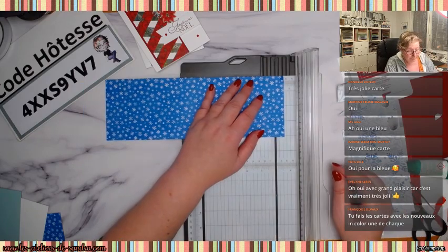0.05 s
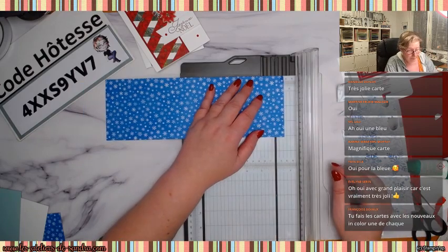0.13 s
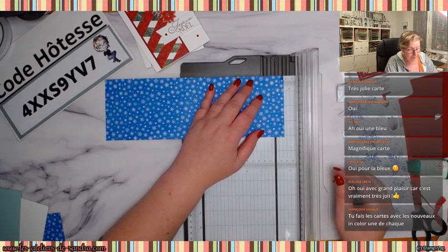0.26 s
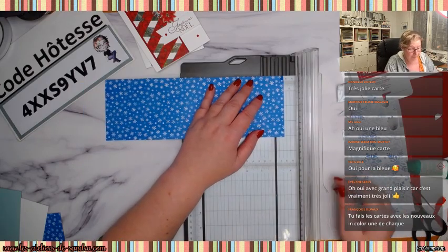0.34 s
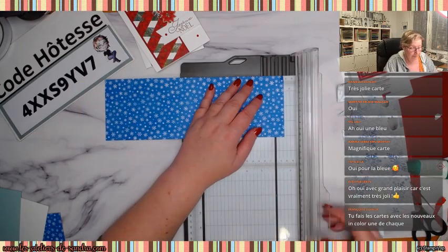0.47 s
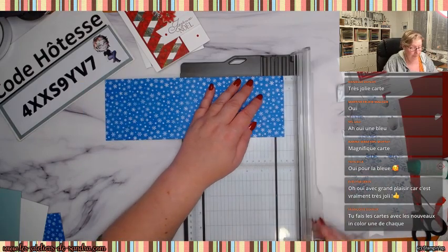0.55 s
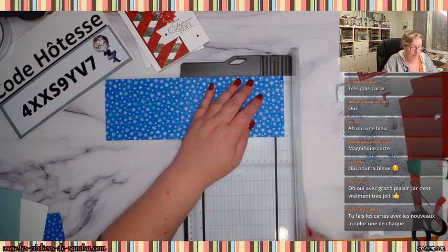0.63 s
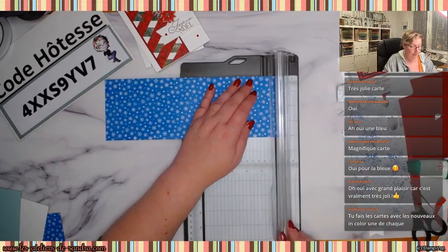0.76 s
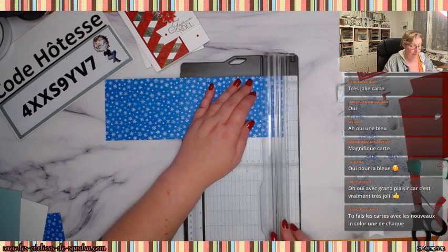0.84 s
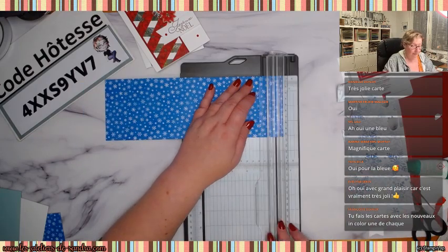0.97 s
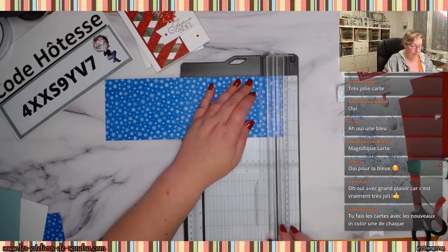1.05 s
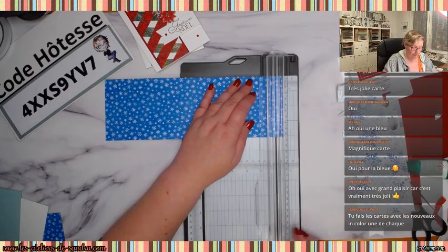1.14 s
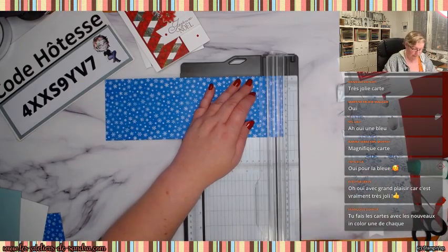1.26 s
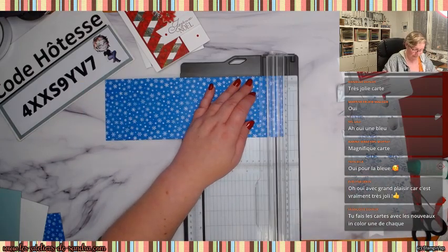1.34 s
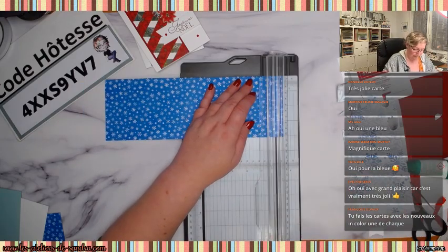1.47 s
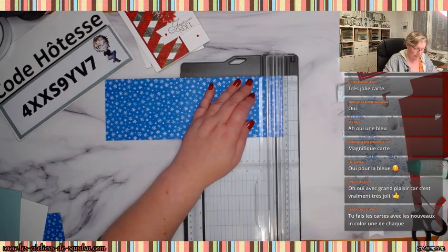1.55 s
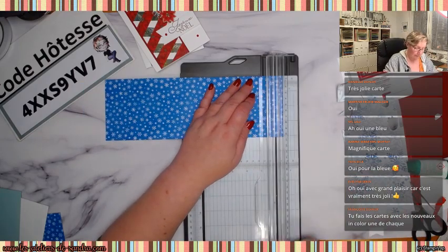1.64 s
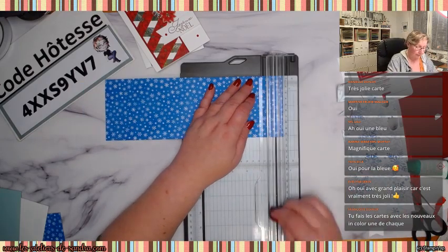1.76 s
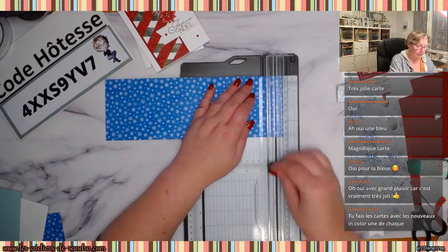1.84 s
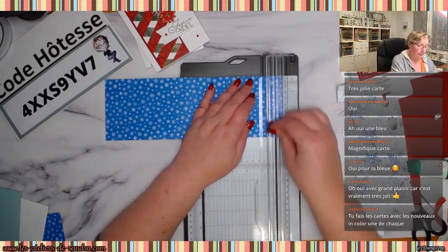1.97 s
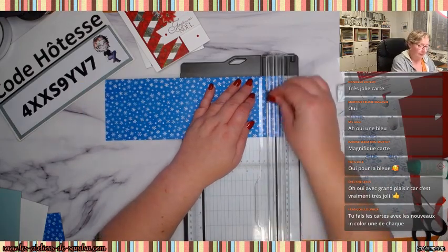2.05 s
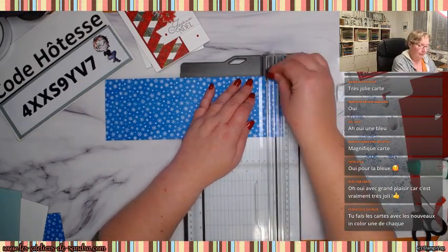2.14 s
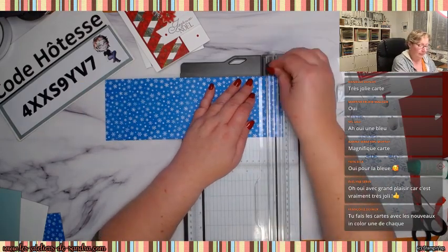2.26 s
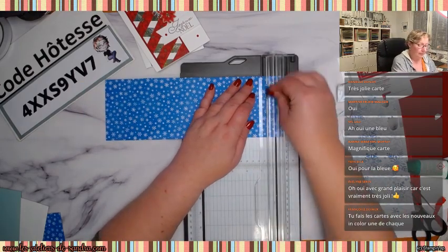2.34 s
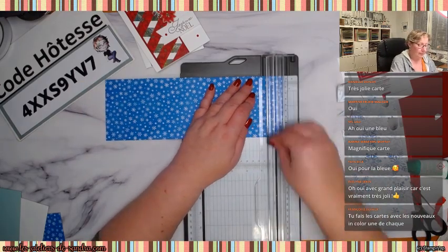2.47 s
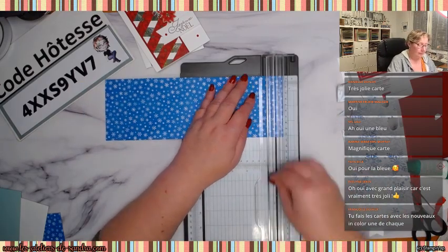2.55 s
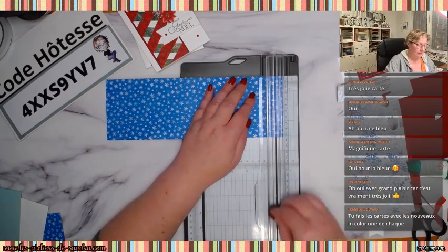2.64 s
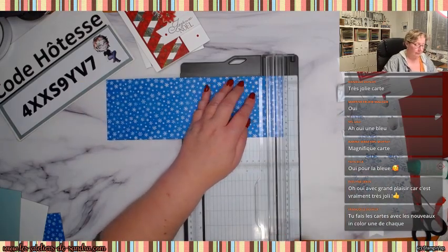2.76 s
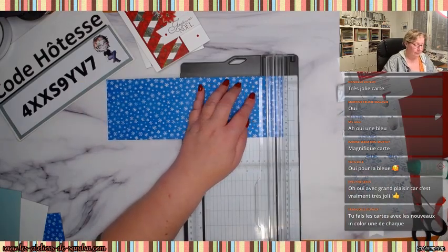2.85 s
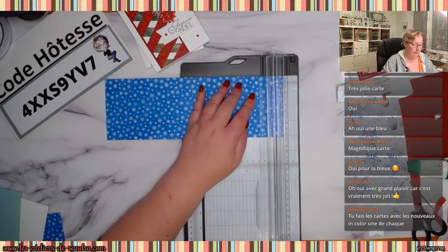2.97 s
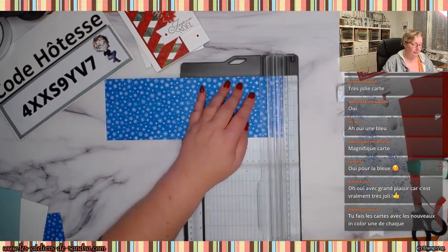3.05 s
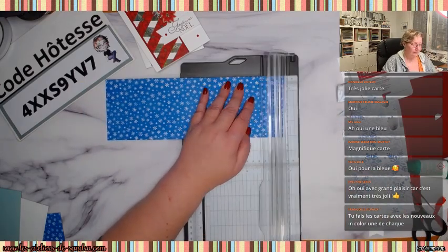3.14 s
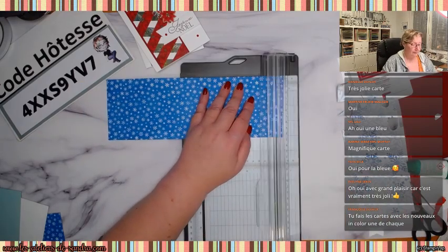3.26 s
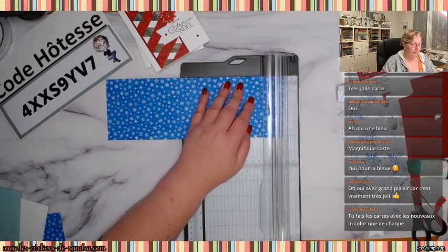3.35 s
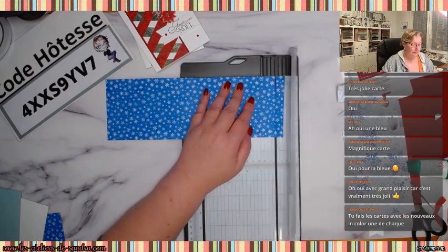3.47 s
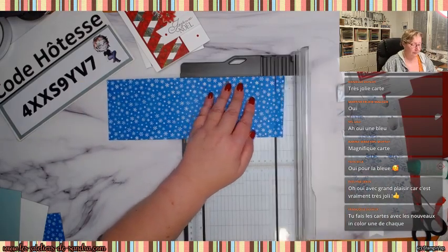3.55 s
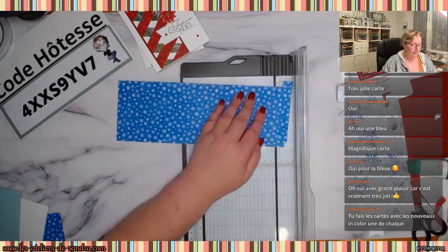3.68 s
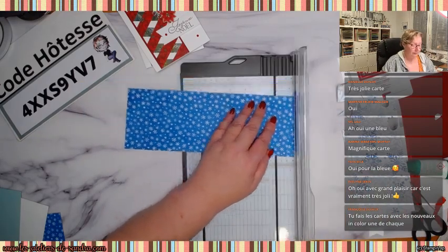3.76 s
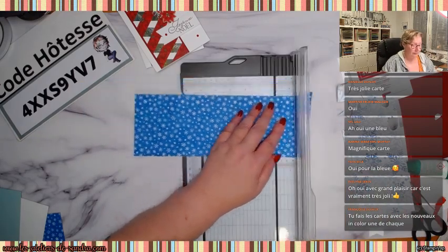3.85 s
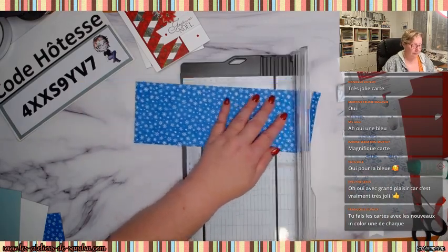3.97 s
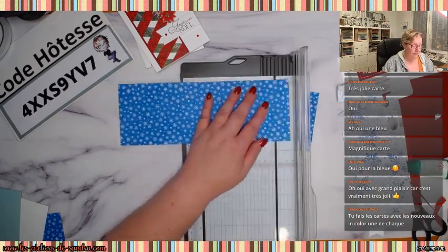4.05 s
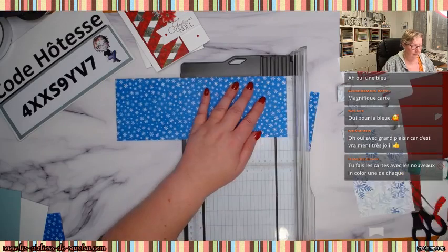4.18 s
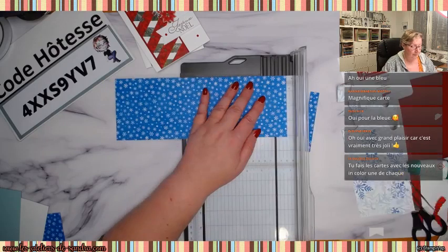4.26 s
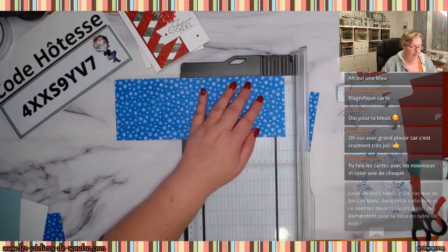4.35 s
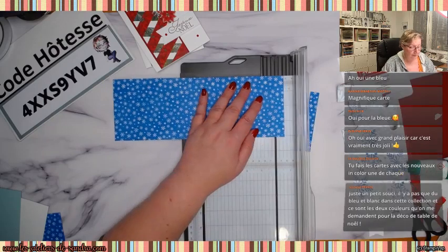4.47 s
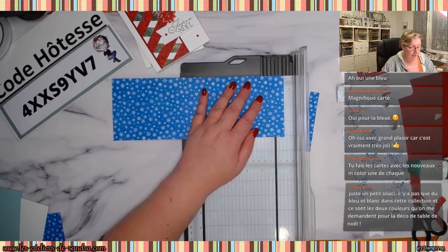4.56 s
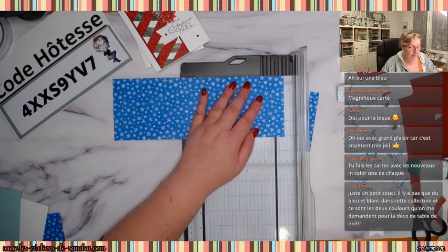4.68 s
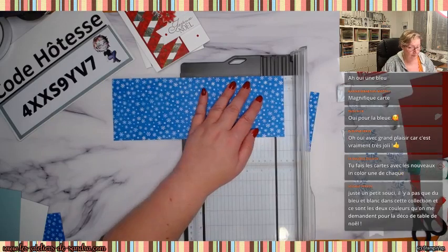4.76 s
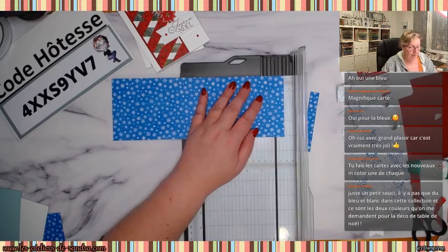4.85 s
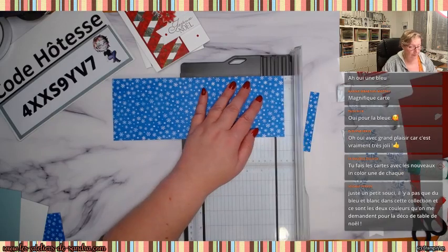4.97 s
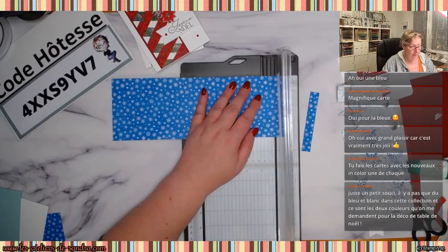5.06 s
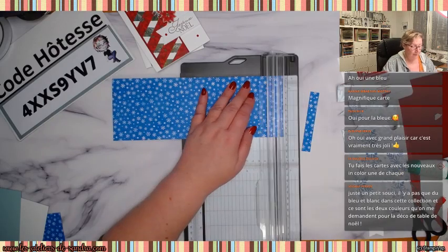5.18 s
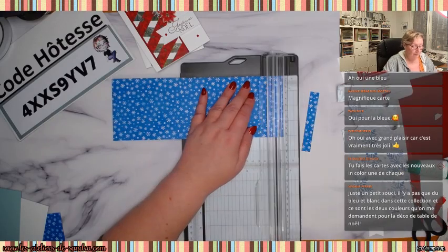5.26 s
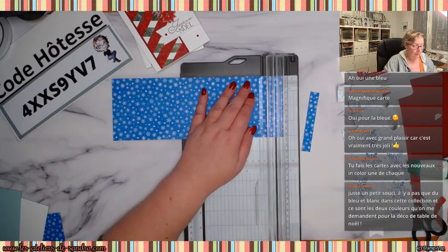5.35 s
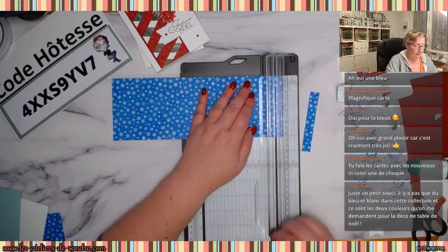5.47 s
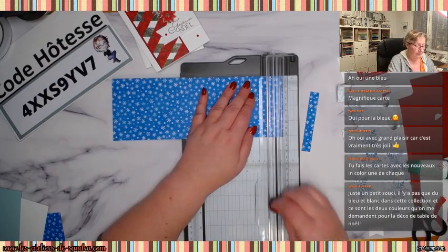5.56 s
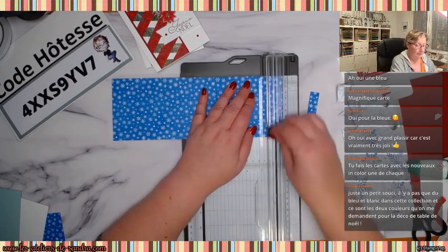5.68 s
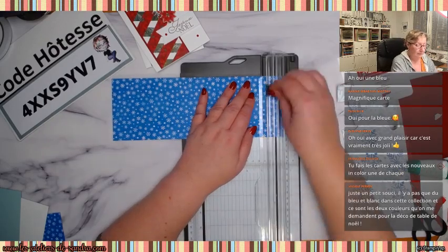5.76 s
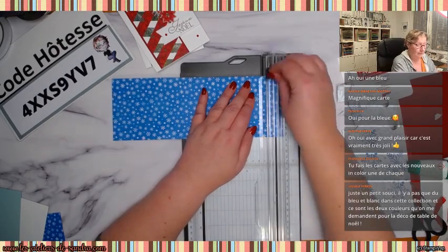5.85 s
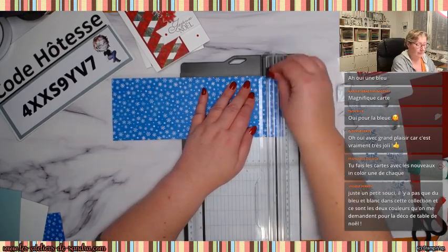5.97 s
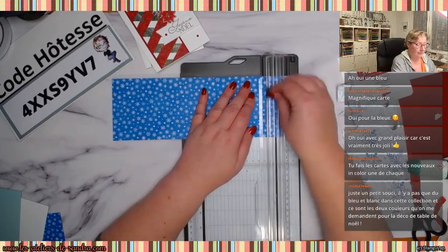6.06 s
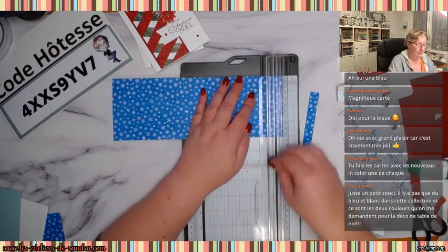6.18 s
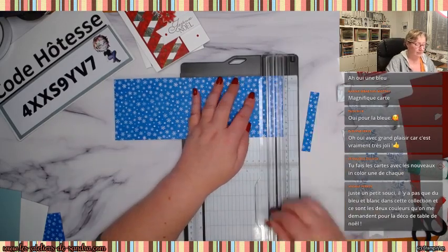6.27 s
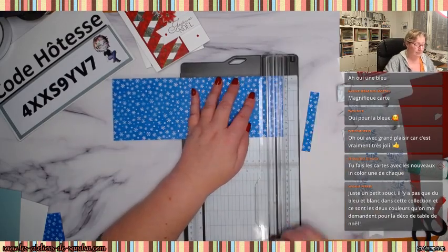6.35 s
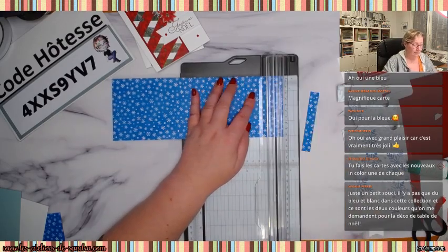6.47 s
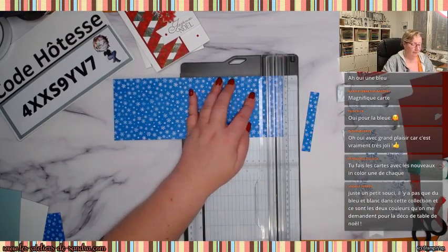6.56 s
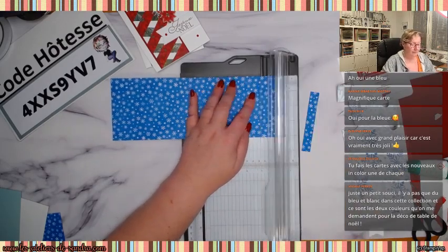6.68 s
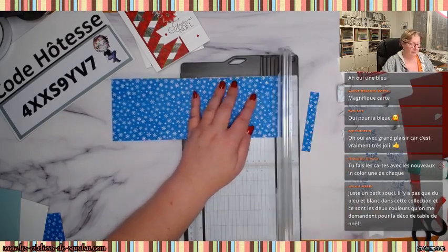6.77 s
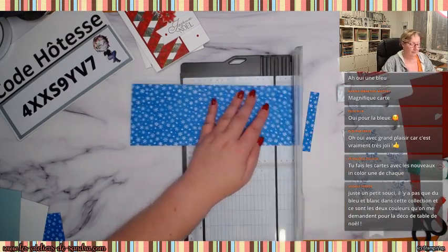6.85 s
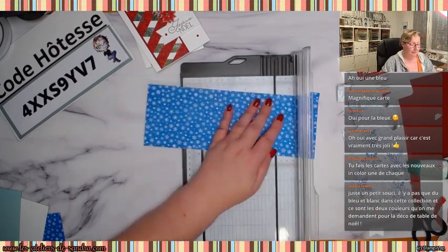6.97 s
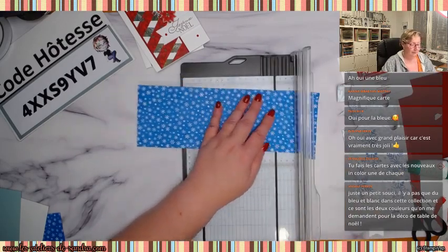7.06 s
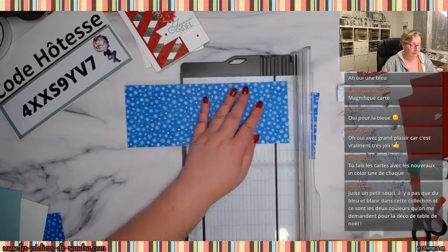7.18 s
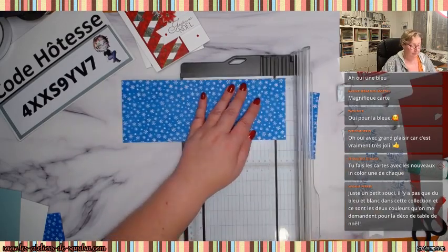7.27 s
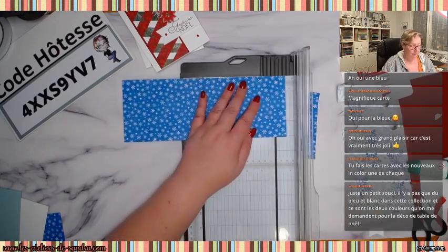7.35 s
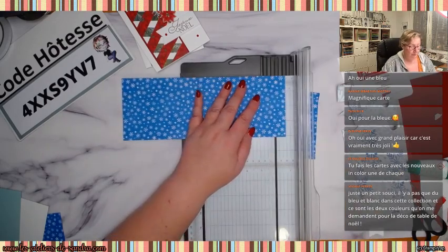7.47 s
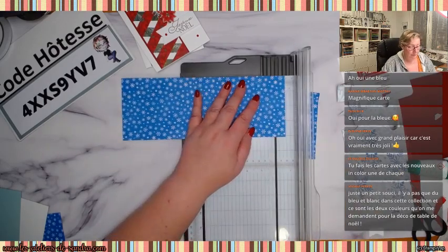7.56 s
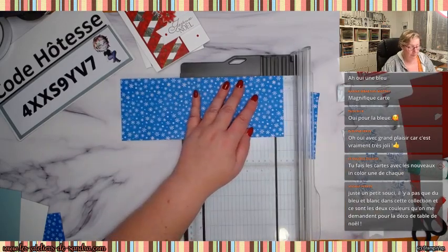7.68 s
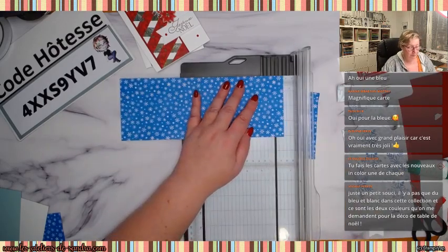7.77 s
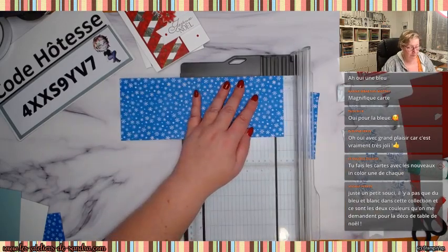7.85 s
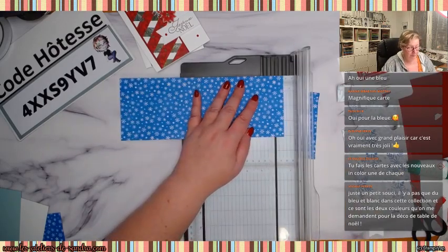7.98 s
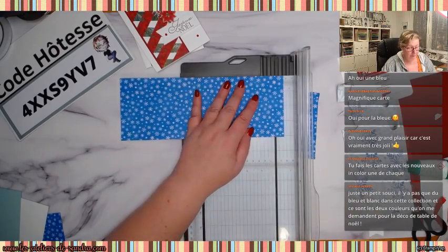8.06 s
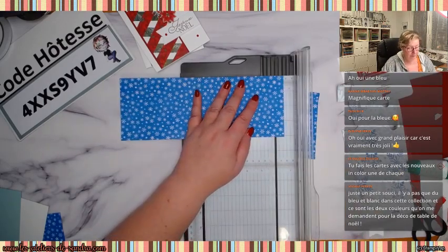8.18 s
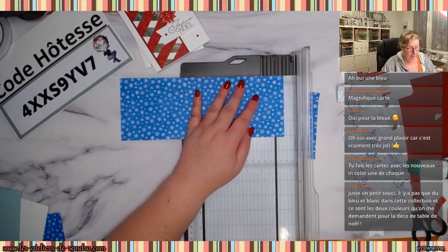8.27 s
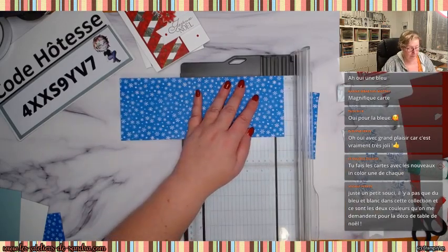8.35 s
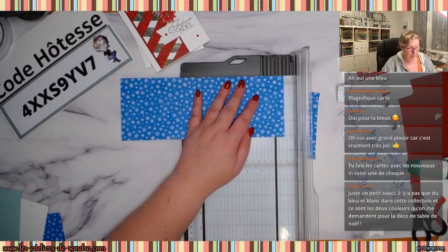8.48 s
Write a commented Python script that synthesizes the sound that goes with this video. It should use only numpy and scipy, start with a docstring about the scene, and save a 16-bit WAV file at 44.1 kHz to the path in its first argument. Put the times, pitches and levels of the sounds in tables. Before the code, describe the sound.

Paper trimming on a tabletop, closely miked with short room reflections. Dry hissing and hollow grumbling slides lead to hard plastic slaps, then a brief gritty tearing rasp with a snap. Hinge chatter, low table thumps and soft swishes of repositioned card come between. The same sequence repeats once, with a stronger rail slap and brighter snap, then settles to near silence.

```python
"""A plastic paper trimmer on a craft table: twice its blade rasps through card with a late bright snap.
Band-shaped fibre noise and rising resonances make the rasp; short damped noise makes the slapping,
clattering rail and the clicks. Carriage, hands and card slide as streaky friction noise, and blows
push the table top into a low swing. Small room, close microphone, quiet room tone."""
import sys
import numpy as np
from scipy import signal
from scipy.fft import rfft, irfft, next_fast_len
from scipy.io import wavfile
from scipy.ndimage import map_coordinates

SR = 44100
rng = np.random.default_rng(int(sys.argv[2]) if len(sys.argv) > 2 else 0)


def int16_out(signal):
    """Quantize to a 16-bit WAV file."""
    q = np.round(np.clip(np.atleast_2d(signal).T, -1, 1) * 32767)
    wavfile.write(sys.argv[1], SR, q.astype(np.int16))


N = 375732
TIME = np.arange(N) / SR

# colour of struck plastic: [f/Hz, relative level per Hz/dB]
PLASTIC = [(88, -45.5), (150, -13.5), (264, -9.5), (524, 0), (637, -3), (941, -6), (1060, -6.5),
           (2060, -4.5), (2270, -9), (3350, -4.5), (5790, -12), (6260, -14.5), (9260, -23), (12900, -23),
           (16000, -30.5)]
# the blade crosses the card: [start/s, end/s, rasp level/dB, table thump peak/dB]
CUTS = [(1.959, 2.188, -40.5, -37), (5.702, 5.877, -40, -32.5)]
# the blade snaps through a knot of fibres: [t/s, peak/dB, top f/Hz]
SNAGS = [(2.1348, -25.5, 6900), (5.838, -18, 14000)]
# the rail slaps shut: [t/s, strength/dB, hollow lows/dB, bright edge/dB, length/factor, ring f/Hz,
# table thump peak/dB]
SLAPS = [(0.8893, -27, -3, -3, 1.3, 1330, -31.5), (1.5835, -20, -0.5, -1, 0.94, 771, -31.5),
         (5.3851, -17.5, -3, 2, .92, 1304, -27.5)]


def amp(db):
    """Decibels to gain."""
    return 10 ** (np.asarray(db) / 20)


def unit(x):
    """Scales to rms 1."""
    return x / np.sqrt(np.mean(x ** 2) + 1e-20)


def read(points, hz):
    """Reads a curve on a log-frequency axis."""
    f, value = np.transpose(points)
    return np.interp(np.log(hz + 1), np.log(f + 1), value)


def add(mix, s, sound):
    """Mixes a sound in at time s."""
    part = mix[max(round(s * SR), 0):][:len(sound)]
    part += sound[:len(part)]


def band(x, lo_hz, hi_hz, order=2):
    """Causal band-pass."""
    edges = [lo_hz, min(hi_hz, SR / 2 - 100)]
    return signal.sosfilt(signal.butter(order, edges, "band", fs=SR, output="sos"), x)


def colour(x, points):
    """Gives x a spectrum, at rms 1."""
    size = next_fast_len(N)
    gain = amp(read(points, np.fft.rfftfreq(size, 1 / SR)))
    return unit(irfft(rfft(x, size) * gain, size)[:N])


def wander(per_s):
    """Smooth random drift of rms 1, with per_s turning knots a second."""
    knots = rng.standard_normal(N // 20)
    return unit(np.interp(TIME * per_s, np.arange(len(knots)), knots))


def friction(grain_db, flutter_db, flutter_per_s):
    """Countless tiny slips of uneven size, coming in clumps."""
    slips = rng.standard_normal(N) * amp(grain_db * np.minimum(rng.exponential(1, N), 6))
    return unit(slips * amp(flutter_db * wander(flutter_per_s)))


def resonate(x, hz, width):
    """A resonance that follows the curve hz, at rms 1."""
    turn = np.exp(2j * np.pi * np.cumsum(hz) / SR)
    r = np.exp(-np.pi * width / SR)
    return unit((turn * signal.lfilter([1 - r], [1, -r], x / turn)).real)


def streaks(x, depth_db, width_hz, life_s, climb_hz_per_s):
    """The contact point moves, so small peaks of colour come, drift in pitch and go."""
    hz, t, z = signal.stft(x, SR, nperseg=512, noverlap=384)
    place = [(hz[:, None] - climb_hz_per_s * t) / width_hz, np.ones((len(hz), 1)) * t / life_s]
    patches = unit(map_coordinates(rng.standard_normal((256, 512)), place, order=1, mode="grid-wrap"))
    return unit(signal.istft(z * amp(depth_db * patches), SR, nperseg=512, noverlap=384)[1][:N])


def stroke(start, end, swell_db, rise_s, fall_s):
    """A hand movement: it gathers speed, holds with a steady swell or fade, and slows."""
    gate = np.interp(TIME, [start - rise_s, start, end, end + fall_s], [0, 1, 1, 0])
    progress = np.clip((TIME - start) / (end - start) - .5, -.5, .5)
    return gate ** 2 * amp(swell_db * progress)


def room_tone(level_db=-64.5):
    """Steady noise, mostly low rumble, for the air of the room."""
    # colour of the room tone: [f/Hz, relative level per Hz/dB]
    air_colour = [(12, -27), (20, 3), (68, -9.5), (104, -11), (187, -18), (221, -13), (335, -21.5),
                  (408, -24.5), (510, -32), (637, -24.5), (754, -38), (866, -30.5), (1650, -34.5),
                  (6290, -40), (15800, -43.5)]
    return amp(level_db) * colour(rng.standard_normal(N), air_colour)


def room(x, wet_db=-12, first_s=0.0055, treble_db=-2, bass_db=-3):
    """Sparse reflections from nearby shelves and walls, each band dying at its own speed."""
    # decay of the reflections: [f/Hz, t60/s]
    decay = [(150, 0.91), (600, 0.36), (2000, 0.23), (5000, 0.22), (14000, 0.3)]
    size = SR // 2
    taps = rng.choice([-1., 1.], size) * (rng.random(size) < 3000 / SR)  # 3000 a second on average
    taps = taps * (np.arange(size) > first_s * SR)
    hz, t, z = signal.stft(taps, SR, nperseg=256)
    tail = signal.istft(z * amp(-60 * t / read(decay, hz)[:, None]), SR, nperseg=256)[1]
    tone_points = [(500, bass_db), (1000, 0), (4500, 0.012), (9000, treble_db)]  # f/Hz, level/dB
    tone = read(tone_points, np.fft.rfftfreq(len(tail), 1 / SR))
    reflections = irfft(rfft(tail / np.linalg.norm(tail)) * amp(tone))
    return amp(wet_db) * signal.oaconvolve(x, reflections)[:N]


def bumps(slap_lag_s=.01, slap_ms=1.9, cut_ms=1.3, snag_ms=.35):
    """All pushes on the table: by hands and trimmer, under slaps, and as the blade enters, snags and leaves."""
    # hands and trimmer bumping the table: [t/s, peak/dB, contact time/ms]
    hand_bumps = [(.612, -39.5, 3.2), (.662, -39, 4.6), (1.07, -47, 1), (1.205, -45.5, 1), (1.239, -46, 4),
                  (1.864, -40, 3.1), (2.671, -33.5, 3.7), (2.722, -34, 6.2), (2.83, -35, 0.96),
                  (3.025, -40, 1.5), (3.13, -22.5, .9), (3.159, -28.5, 2.7), (3.4065, -22.5, 0.67),
                  (3.517, -35.5, 0.73), (5.243, -33, 3.1), (5.513, -29.5, 5.5), (5.786, -26, 1.2),
                  (6.11, -40.5, 2.2), (6.367, -42, 4.1), (6.755, -28.5, 0.64), (6.794, -28.5, 1.64)]
    rows = list(hand_bumps)
    rows += [(s + slap_lag_s, thump_db, slap_ms) for s, *_, thump_db in SLAPS]
    for (start, end, _, thump_db), (snag_s, *_) in zip(CUTS, SNAGS):
        rows += [(start, thump_db, cut_ms), (snag_s, thump_db, snag_ms), (end, thump_db, cut_ms)]
    return rows


def thumps(table_hz=37, table_q=1.25):
    """A short push on the table top, which swings back; harder contacts also wake its higher modes."""
    # higher modes of the table top: [f/Hz, level/dB, t60/s]
    board_modes = [(121, -16, 0.17), (210, -9, 0.045), (336, -6, 0.018)]
    t, out = np.arange(SR // 5) / SR, np.zeros(N)
    w = 2 * np.pi * table_hz
    b, a = signal.bilinear([1, 0, 0], [1, w / table_q, w * w], SR)
    board = sum(2 * np.pi * hz / SR * amp(db - 60 * t / t60) * np.cos(2 * np.pi * hz * t)
                for hz, db, t60 in board_modes)
    for s, db, contact_ms in bumps():
        u = 1000 * t / contact_ms
        push = u * np.exp(-u)  # strongest after one contact time
        swing = signal.lfilter(b, a, push) + signal.fftconvolve(push, board)[:len(t)]
        add(out, s - contact_ms / 1000, amp(db) * swing / abs(swing).max())
    return out


def card(card_db=-3.0, rise_s=0.045, fall_s=0.085, fizz_above_hz=5900):
    """The sheet swishes along the bed under the fingers; some pushes fizz more than others."""
    # pushes along the bed: [start/s, end/s, level before card_db/dB, swell from start to end/dB,
    # extra fizz/dB]
    pushes = [(3.623, 3.906, -52.5, -0.5, -1), (3.98, 4.105, -52, -7.5, 1), (6.784, 6.965, -50, 4.5, 1.5),
              (7.079, 7.185, -50.5, 0.5, -2)]
    # colour of the swish: [f/Hz, relative level per Hz/dB]
    card_colour = [(180, -16), (300, -1.5), (477, -16), (592, -7.5), (1470, -8), (1990, -5), (2470, -8.5),
                   (4060, -3), (4790, -7.5), (5470, -7.5), (7620, -12.5), (13600, -9), (15800, -15)]
    swish = colour(friction(grain_db=0.4, flutter_db=0.74, flutter_per_s=110), card_colour)
    swish = streaks(swish, depth_db=2, width_hz=400, life_s=.06, climb_hz_per_s=0)
    fizz = signal.sosfiltfilt(signal.butter(2, fizz_above_hz, "high", fs=SR, output="sos"), swish)
    out = np.zeros(N)
    for start, end, db, swell_db, fizz_db in pushes:
        shape = stroke(start, end, swell_db, rise_s, fall_s)
        out += amp(card_db + db) * shape * (swish + (amp(fizz_db) - 1) * fizz)
    return out


def sliding(rise_s=0.12, fall_s=0.077, overrun_s=0.084, overrun_hiss_db=-79, overrun_grumble_db=-56):
    """Speed and pressure of everything that slides over the plastic."""
    # carriage runs, rail swings, grips and finger moves: [start/s, end/s, hiss drive/dB,
    # grumble drive/dB, swell from start to end/dB]
    strokes = [(.17, 0.29, -76, -70.5, 18.5), (0.332, 0.897, -64.5, -59, 0.5), (1.02, 1.26, -72.5, -66, 7),
               (1.6, 1.947, -60.5, -55.5, -1), (2.38, 2.746, -58.5, -57.5, -3),
               (2.78, 3.309, -66.5, -61, 0), (3.408, 3.579, -59, -56.5, -4), (4.194, 4.4, -76, -79, -2),
               (4.648, 4.983, -81, -69, 12), (5.02, 5.352, -62, -59, 7), (5.45, 5.7, -60.5, -59, 5.5),
               (6.052, 6.171, -58, -53, 4), (6.182, 6.303, -59, -58, -3), (6.3, 6.8, -65, -59, 3.5),
               (6.82, 7.628, -76.5, -66.5, -7.5), (7.9, 8.064, -90.5, -75.5, -1.5)]
    # the carriage rolls on through each cut and just beyond
    overruns = [(start, end + overrun_s, overrun_hiss_db, overrun_grumble_db, 0) for start, end, *_ in CUTS]
    speed, pressure = np.zeros((2, N))
    for start, end, hiss_db, grumble_db, swell_db in list(strokes) + overruns:
        shape = stroke(start, end, swell_db, rise_s, fall_s)
        speed = np.maximum(speed, amp(hiss_db) * shape)
        pressure = np.maximum(pressure, amp(grumble_db) * shape)
    return speed, pressure


def rubbing(hiss_db=-1, grumble_db=0.92, shift_db=3, catch_db=-16, catches_per_s=45):
    """Dry sliding over plastic: a hiss of shifting colour and tiny catches above the grumble of the hollow bed."""
    # colour of the hiss: [f/Hz, relative level per Hz/dB]
    hiss_colour = [(710, -37), (1200, -3), (1280, 4), (1540, -4), (1660, 1), (2550, -2), (2970, -2.5),
                   (3420, -1.5), (4280, -2.5), (8100, -12), (10300, -14), (11900, -10.5), (15800, -20.5)]
    # colour of the grumble: [f/Hz, relative level per Hz/dB]
    grumble_colour = [(30, 2), (70, 8), (150, 0.5), (300, 0), (450, -5), (600, -0.5), (900, -8),
                      (1300, -14), (2200, -34.5)]
    # bright bands of dry sliding: [f/Hz, width/Hz, level at top speed/dB]
    squeaks = [(4200, 490, -5), (10400, 1100, -8)]
    speed, pressure = sliding()
    hiss = colour(friction(grain_db=1.0, flutter_db=2.5, flutter_per_s=100), hiss_colour)
    hiss = streaks(hiss, depth_db=1.8, width_hz=600, life_s=.05, climb_hz_per_s=-3000)
    for hz, width, db in squeaks:
        squeak = resonate(rng.standard_normal(N), hz * (1 + 0.022 * wander(7)), width)
        # squeaks gain on the hiss as the sliding gets faster
        hiss = hiss + amp(db + shift_db * wander(12)) * speed / speed.max() * squeak
    grumble = colour(friction(grain_db=2.5, flutter_db=1.7, flutter_per_s=40), grumble_colour)
    catches = rng.uniform(-0.87, 1, N) * (rng.random(N) < catches_per_s / SR)
    catches = colour(catches, PLASTIC)
    t = np.arange(SR // 40) / SR
    shiver = rng.standard_normal(len(t)) * amp(-60 * t / 0.028)  # each catch shivers briefly
    catches = unit(signal.oaconvolve(catches, shiver)[:N])
    bed = amp(grumble_db) * grumble + amp(catch_db) * catches
    return amp(hiss_db) * speed * hiss + pressure * bed


def contacts(count=4, rebound_hollow_db=0, rebound_gap_ratio=1.05, give_lead_s=0.0046, give_db=-16,
             give_length=2.6):
    """All plastic contacts: single clicks, the landings of the rail, and chatter of weakening rebounds."""
    # contacts of carriage, rail and fingernails: [t/s, strength/dB, hollow lows/dB, bright edge/dB,
    # length/factor, ring f/Hz]
    clicks = [(.349, -67, 20, -16, 0.9, 560), (.642, -63, 6, 6, 5, 620), (.687, -47, -3, -3, 0.9, 3420),
              (.793, -53.5, -2, -14, 1.6, 1346), (.832, -52.5, 3, -25, 0.98, 870),
              (1.067, -65, -17, -2, 1, 1400), (1.229, -61, -4, 1.5, 1.5, 4000),
              (1.536, -48.5, 2.5, -24.5, 2.4, 1823), (1.551, -54.5, 11.5, -37, 1.4, 800),
              (2.294, -62.5, 20, -24, 0.63, 604), (2.483, -60, 20.5, 3, 1.2, 560),
              (2.881, -49.5, 4, -37, 2.5, 1970), (2.923, -50.5, 7, -11, 1, 2280),
              (2.9395, -61.5, 23, -23, 0.7, 900), (3.089, -50, 0, -7, 5.5, 1810),
              (3.109, -57, 9, -4, 1.6, 1400), (3.133, -44, 18, -17, 1.9, 370),
              (3.1565, -53, -10, 6, .9, 3970), (3.19, -64, 20, -10, 1.5, 1720),
              (3.25, -50, 4, -30, 2.8, 1790), (3.4065, -46.5, 2, 4, .3, 4030),
              (3.564, -57.5, 5, -23, 0.68, 1820), (4.164, -50.5, -5, -36, 0.76, 1350),
              (4.19, -49.5, -3, -33, 1.2, 1285), (4.32, -70, -2.5, 6, 3.7, 4000),
              (5.336, -32.5, -10, -8, 0.74, 3730), (5.3705, -46.5, 9.5, -6, 1.1, 790),
              (5.979, -62.5, 20, -8, 1.1, 780), (6.002, -59, 27.5, -42, 0.46, 780),
              (6.395, -57, 9.5, -5, 1.5, 1390), (6.425, -52, -6, -16, 1.5, 1400),
              (6.479, -43.5, -6, -13, 0.6, 1470), (6.502, -49, 1.5, -15, 0.63, 1430),
              (6.5355, -35.5, -6.5, -29, 0.67, 2880), (6.62, -56.5, 20.5, -6, 0.45, 675),
              (6.692, -48, 7, -13, 0.74, 552), (6.614, -52, 9, -10, 1, 1440),
              (6.755, -46.5, -14, -18, 0.11, 1360), (6.834, -49.5, -2, -21, 1.5, 1410),
              (6.899, -48.5, -6, -2, 0.35, 3300), (7.379, -69.5, 13, -20.5, 0.91, 1280),
              (7.415, -59.5, 4.5, -35, 1.4, 1340)]
    # how every slap lands, a first touch, both ends, a rebound and late settling: [delay/s,
    # added strength/dB, added hollow lows/dB, added bright edge/dB]
    landing = [(-.004, -8.5, 4.5, -11.5), (0, 2.5, -8, -10.5), (.008, 1, 0.5, -7), (.0125, -13, 5.5, -7),
               (.045, -30, 7, -7.5), (.075, -30, 5, -12)]
    # the rail is gripped or lifted and chatters in its hinge: [t/s, strength/dB, hollow lows/dB,
    # bright edge/dB, first rebound gap/s, change per rebound/dB, ring f/Hz]
    clatters = [(2.7713, -28.5, -7.5, -10.5, .0026, -7.5, 1370), (3.1224, -33, 5, -7.5, .0105, -4, 930),
                (3.205, -30, -2.5, -8.5, .011, -10, 1760), (5.209, -34, 1.5, -11.5, .006, -3, 791),
                (6.6215, -56, 23, -8, .005, -17, 770), (6.6935, -48.5, 14.5, 3.5, .005, -20, 552)]
    rows = list(clicks)
    for s, db, low_db, edge_db, length, ring_hz, _ in SLAPS:
        rows += [(s + delay, db + part_db, low_db + hollow_db, edge_db + bright_db, length, ring_hz)
                 for delay, part_db, hollow_db, bright_db in landing]
    for s, db, low_db, edge_db, gap, rebound_db, ring_hz in clatters:
        # the hinge gives a little just before it lets go
        rows.append((s - give_lead_s, db + give_db, low_db, edge_db, give_length, ring_hz))
        for k in range(count):
            rows.append((s, db + k * rebound_db, low_db + k * rebound_hollow_db, edge_db, 1, ring_hz))
            s += gap * rebound_gap_ratio ** k
    return rows


def knocks(low_t60=0.065, mid_t60=0.032, high_t60=0.03, spot_t60=0.03, spot_db=-5.5, rise_s=0.00027,
           blow_s=0.0028, crack=1.8, dull_below_db=-12, dull_db_per_octave=28):
    """Each contact is a crack, a quickly damped shiver of the plastic and one ring; length scales every t60."""
    t, out = np.arange(SR // 7) / SR, np.zeros(N)
    rise = 1 - np.exp(-t / rise_s)
    shiver = colour(rng.standard_normal(N), PLASTIC)
    tick = irfft(amp(read(PLASTIC, np.fft.rfftfreq(64, 1 / SR))))
    tick = np.roll(tick / tick.max(), 8)

    def same_energy(x):
        return x * np.sqrt(blow_s * SR / np.sum(x ** 2))

    for k, (s, db, low_db, edge_db, length, ring_hz) in enumerate(contacts()):
        # a contact with a weak edge is soft, and loses upper mids too
        soft = 2 ** np.clip((edge_db - dull_below_db) / dull_db_per_octave, -1, 0)
        bands = [(250, 1250, 2, low_t60, low_db),  # low Hz, high Hz, order, t60 s, dB
                 (1400, 5600 * soft, 2, mid_t60, 0),
                 (6200, 17000, 3, high_t60, edge_db)]
        grain = np.roll(shiver, -k * len(t))[:len(t)] * rise
        add(grain, 0, crack * tick)
        for lo_hz, hi_hz, order, t60, part_db in bands:
            part = band(grain * amp(-60 * t / (t60 * length)), lo_hz, hi_hz, order=order)
            add(out, s, amp(db + part_db) * same_energy(part))
            grain = -grain  # neighbouring bands swing in opposite senses
        # each spot of the plastic favours one ring
        spot = np.sin(2 * np.pi * ring_hz * t + rng.uniform(0, 2 * np.pi))
        spot = spot * amp(-60 * t / (spot_t60 * length)) * rise
        add(out, s, amp(db + spot_db) * same_energy(spot))
    return out


def ring(x, ring_db=-58):
    """The few long modes of rail and bed sing on after each blow."""
    # what rail and bed ring with: [f/Hz, relative level/dB, t60/s]
    rail_modes = [(113, 0, .25), (520, -13, .1), (560, -7, .1), (690, 0, .11), (791, 1, .16), (873, 0, .14),
                  (951, -1, .11), (1270, -4, .12), (1357, -3, .12), (1478, -6, .12), (1735, -6, .13),
                  (1818, -6, .11), (2414, -6, .11), (2762, -4, .11), (3338, -3, .13), (3440, -4, .13),
                  (3734, -5, .12), (4036, -3, .11), (4260, -7, .11), (6116, -6, .08)]
    t = np.arange(SR // 3) / SR
    modes = sum(amp(db - 60 * t / t60) * np.cos(2 * np.pi * hz * t) for hz, db, t60 in rail_modes)
    return amp(ring_db) * signal.oaconvolve(x, modes)[:N]


def snags():
    """A single bright snap late in each cut: a click and a very short shiver of the blade."""
    t, out = np.arange(SR // 50) / SR, np.zeros(N)
    shiver = .2 * amp(-60 * t / .008)
    for s, db, top_hz in SNAGS:
        snap = band((t == 0) + shiver * rng.standard_normal(len(t)), 2800, top_hz)
        add(out, s, amp(db) * snap / abs(snap).max())
    return out


def cuts(blade_db=-7, sweep_per_s=0.36, unsteady=0.0067, bite_db=-42, bite_t60=0.049, tear_db=-10,
         entry_db=-0.5, entry_s=.012):
    """The blade parts fibres; resonances along the rail tighten as it travels, so they sweep upward."""
    # colour of the parting fibres: [f/Hz, relative level per Hz/dB]
    rasp_colour = [(59, -23), (100, -3), (868, -1), (1100, -8), (1540, -10), (2020, -17), (2560, -33.5),
                   (4160, -13), (7370, -13.5), (15800, -13)]
    # carriage resonances: [f at the start/Hz, width/Hz, relative level/dB]
    blade_modes = [(1920, 220, -6.5), (2800, 960, -4.5), (4110, 540, -1), (5720, 350, -11.5),
                   (9740, 900, -6), (14600, 910, -4.5)]
    fibres = colour(friction(grain_db=2.6, flutter_db=1.4, flutter_per_s=350), rasp_colour)
    fibres = streaks(fibres, depth_db=4.8, width_hz=260, life_s=.028, climb_hz_per_s=11000)
    tearing = unit(band(friction(grain_db=6.5, flutter_db=4.0, flutter_per_s=86), 510, 2200))
    wobble, out = unsteady * wander(45), np.zeros(N)
    for start, end, db, _ in CUTS:
        at = np.arange(round(start * SR), round(end * SR))
        t = (at - at[0]) / SR
        rise = np.exp(sweep_per_s * t + wobble[at])
        blade = sum(amp(mode_db) * resonate(rng.standard_normal(len(at)), hz * rise, width)
                    for hz, width, mode_db in blade_modes)
        rasp = unit(fibres[at] + amp(blade_db) * blade + amp(tear_db) * tearing[at])
        rasp = amp(db + entry_db * np.exp(-t / entry_s)) * rasp  # builds as the blade sinks in
        bite = amp(bite_db - 60 * t / bite_t60) * tearing[at]  # the edge of the card resists first
        add(out, start, (rasp + bite) * signal.windows.tukey(len(t), .025))
    return out


def scene():
    """Trimmer, card and table in a quiet room."""
    blows = knocks()
    near = thumps() + card() + rubbing() + blows + ring(blows) + snags() + cuts()
    return (near + room(near) + room_tone())[None]


def record(dry, edge_hz=16000):
    """A steep low-pass limits the band of the whole mix."""
    low_pass = signal.firwin(511, edge_hz, window=("kaiser", 8), fs=SR)
    return signal.oaconvolve(dry, low_pass[None], "same")


dry = scene()
out = record(dry)
int16_out(out)
```